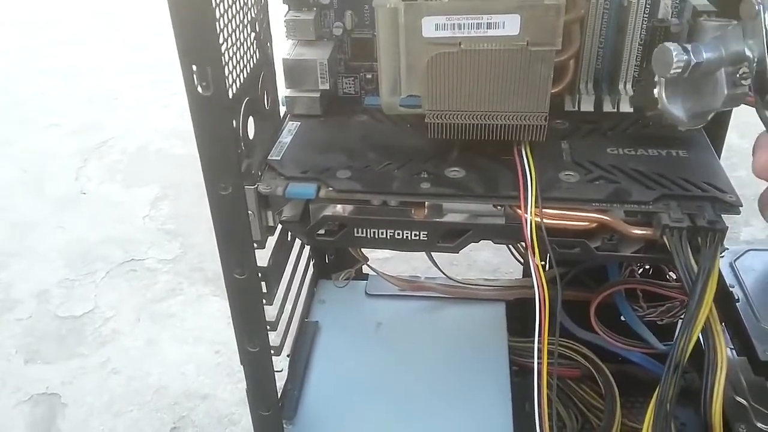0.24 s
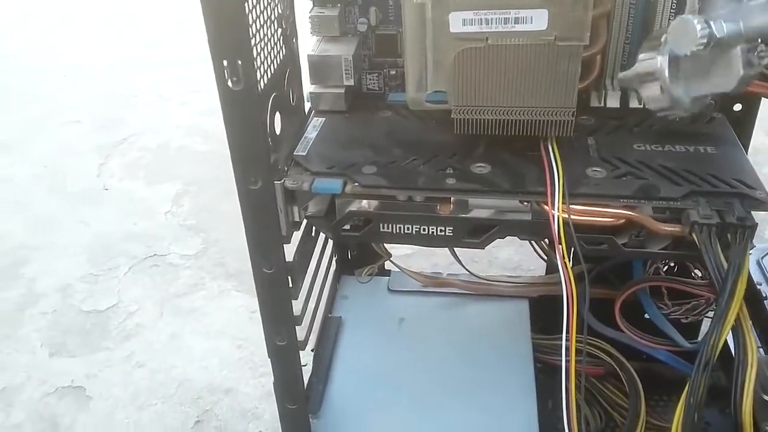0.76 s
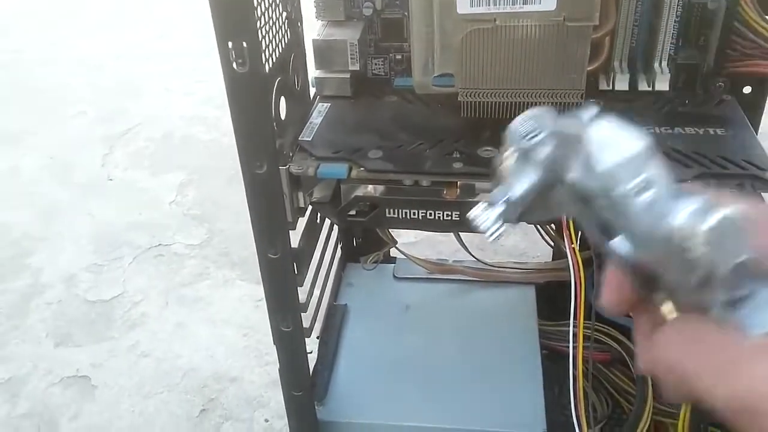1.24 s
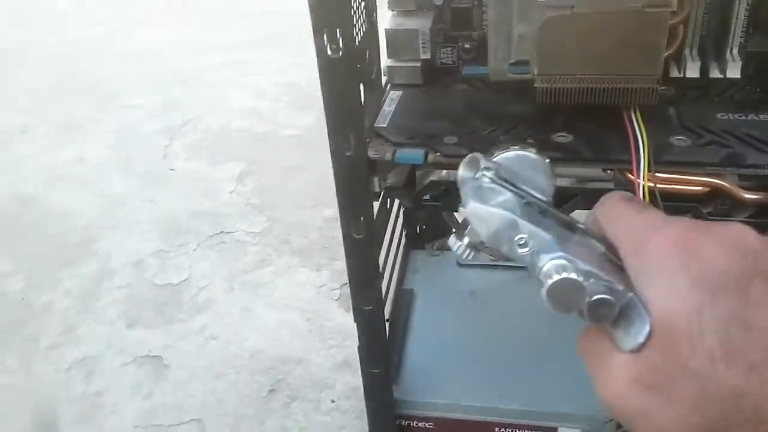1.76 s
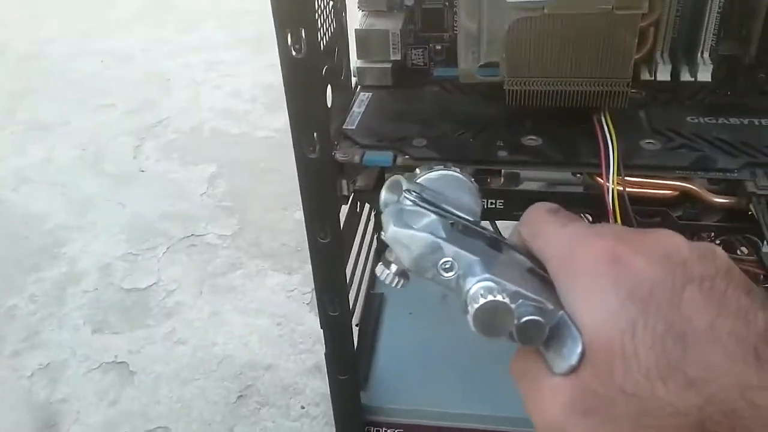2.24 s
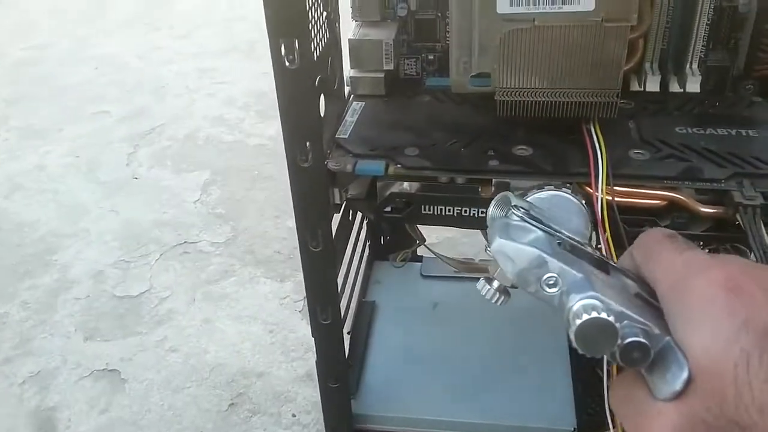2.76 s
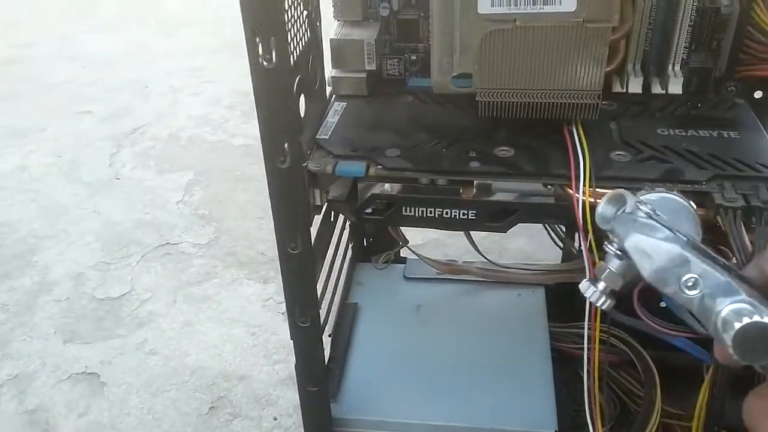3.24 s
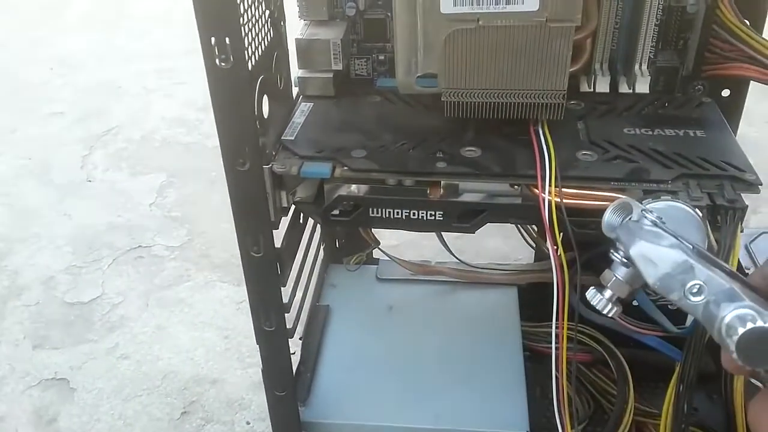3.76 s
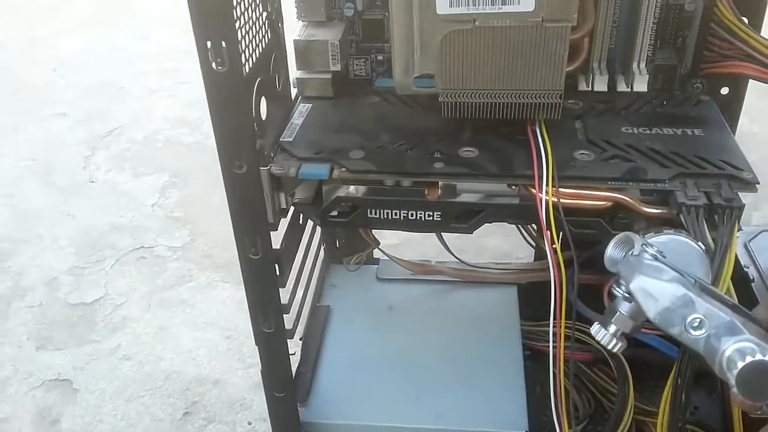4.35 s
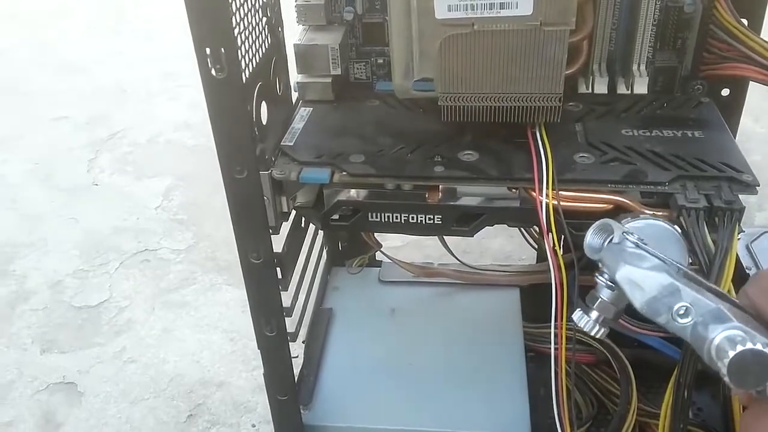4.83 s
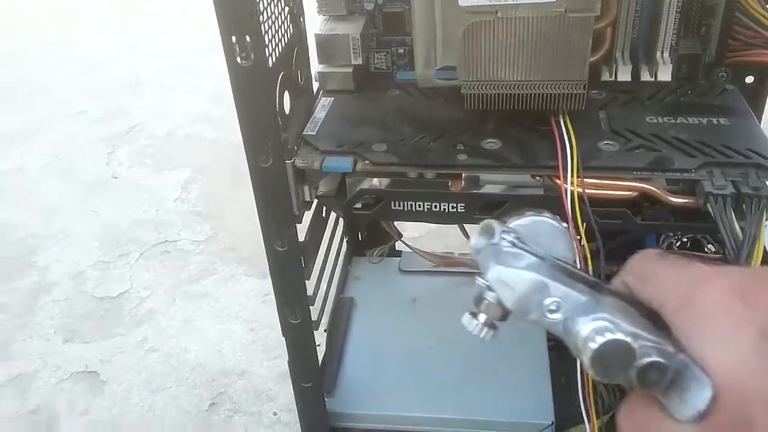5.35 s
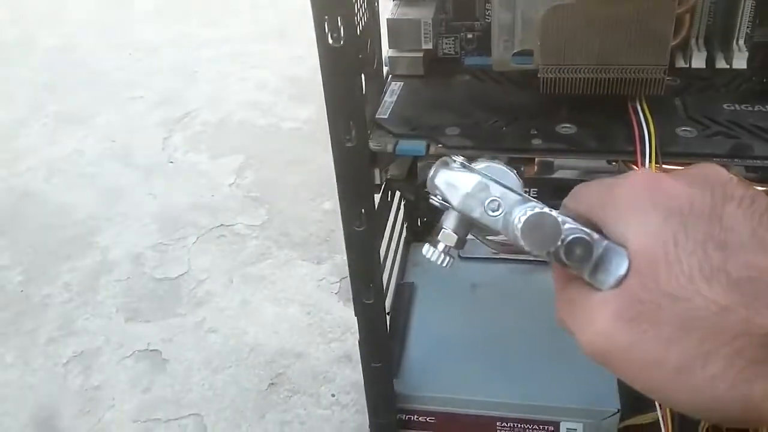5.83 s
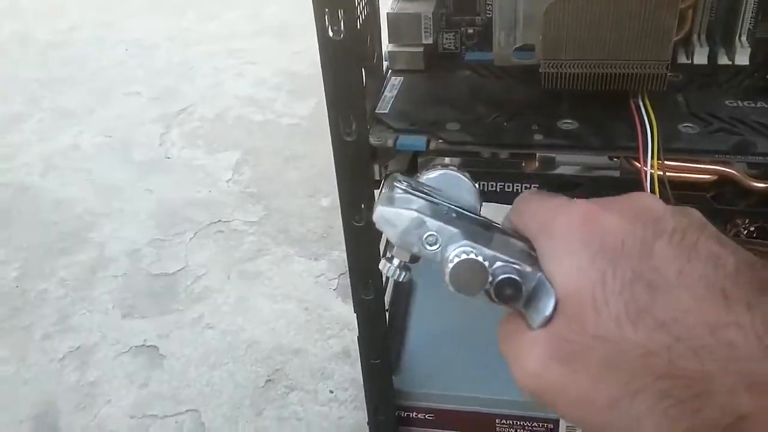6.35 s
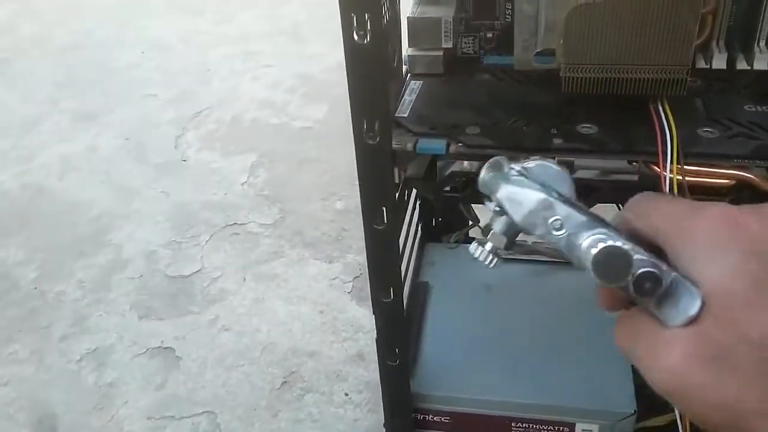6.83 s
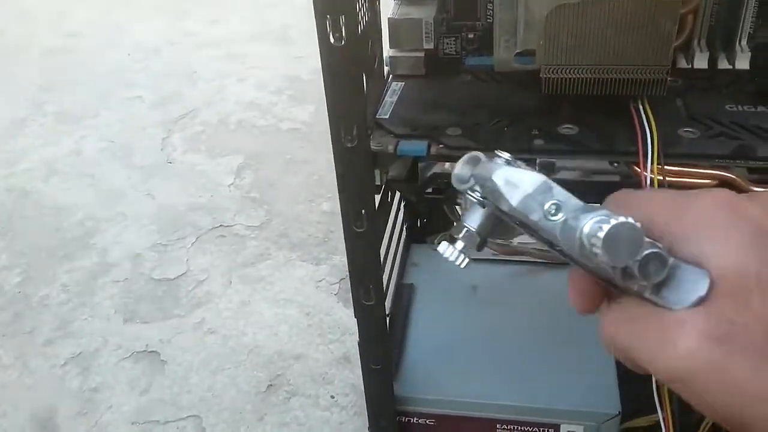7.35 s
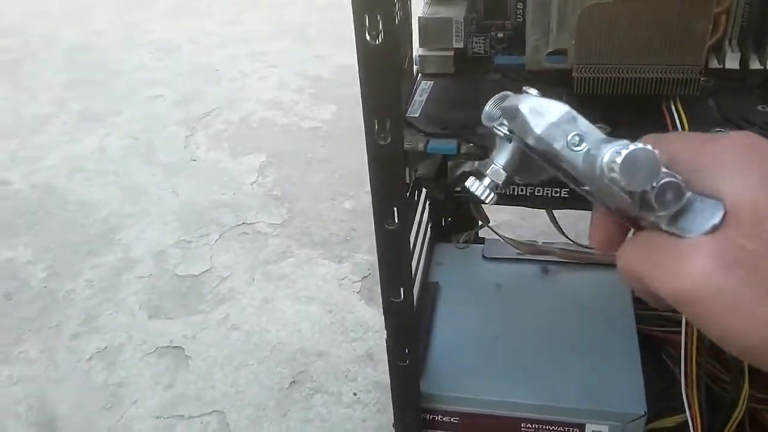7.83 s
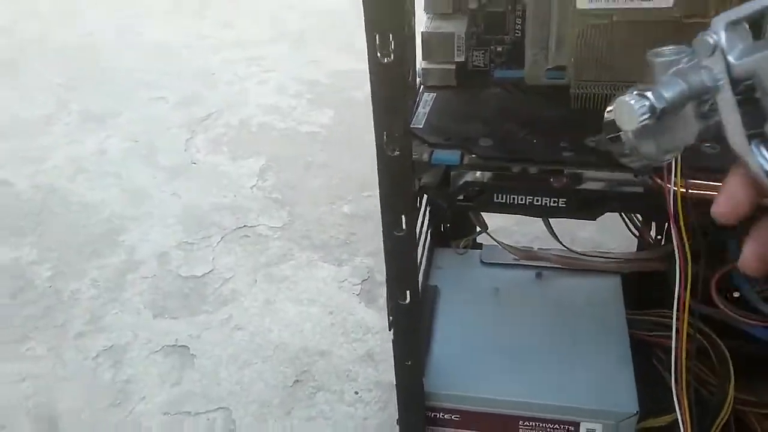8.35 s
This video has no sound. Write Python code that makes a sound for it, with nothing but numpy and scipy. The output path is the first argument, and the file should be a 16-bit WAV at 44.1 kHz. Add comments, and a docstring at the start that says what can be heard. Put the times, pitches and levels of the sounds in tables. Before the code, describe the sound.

A close, centred listen to an air blow gun cleaning an open computer case in a workshop with low rumble and a faint wavering hum near 108 Hz. Thirteen dense, turbulent puffs, each about 0.2 seconds with quick onset and cutoff, start at 0.3, 0.8, 1.85, 2.4, 3.0, 3.55, 4.1, 4.9, 5.9, 6.6, 7.15, 7.7 and 8.0 seconds. Most swell and brighten as they flow; their tint varies, the first two airy, others hollow, resonant or sharply hissing. Short case and room tails follow. Barely audible fan tones coast after several puffs, mostly falling in pitch, and fins ring faintly around 2.05 and 3.3. A tiny sliding squeak comes at 1.3 to 1.4. Soft rubs and dull bumps of hand and hose appear at 5.8, 7.1, 7.5, 7.9 and 8.3. Small bright steel trigger ticks close it at 8.3 and, doubled, 8.46.

```python
"""In a workshop, a spray gun blows thirteen short puffs of compressed air into an open computer case, close by.
The jet is turbulent noise shaped by what it hits: edges hiss, gaps and case resonate, panels add comb colour.
Decaying fin tones, sliding fan and squeak tones, steel ticks and swells of band-limited noise surround the puffs.
Diffuse tails give the case and workshop their answer; low noise and a wavering hum lie beneath."""
import sys
import numpy as np
from scipy import signal
from scipy.fft import rfft, irfft, next_fast_len
from scipy.io import wavfile
from scipy.ndimage import map_coordinates

SR = 44100
rng = np.random.default_rng(int(sys.argv[2]) if len(sys.argv) > 2 else 0)


def dump_mix(stems):
    """Bounce the given channels to the path in sys.argv[1] as a 16-bit WAV at rate SR."""
    frames = np.atleast_2d(stems).T  # one column per channel
    limited = np.clip(frames, -1, 1)  # hard clip at full scale
    pcm = np.round(limited * 32767).astype(np.int16)
    wavfile.write(sys.argv[1], SR, pcm)


N = 378819

# Trigger pulls. A gain scales the build-up of the flow, an arch the bulge as the jet sweeps across its mark;
# each puff excites one broad hollow and two narrow gaps:
# (valve opens [s], valve closes [s], strength [dB], its gain [dB], its arch [dB],
#  brightness [dB per octave], its gain [dB per octave], its arch [dB per octave],
#  edge hiss [dB], its gain [dB], hollow [Hz], hollow boost [dB],
#  lower gap [Hz], lower gap boost [dB], upper gap [Hz], upper gap boost [dB])
TRIGGER_PULLS = [(0.33, 0.515, -27, 5.5, 1.5, -4, 2.5, 1.1, 5.5, -12, 1050.0, 1.5, 2300, 5.5, 13980.0, 11),
                 (0.821, 0.997, -27.5, 8, -2.5, -1.76, 5, 0.5, 0, 0, 1790.0, 5.5, 4600, 3, 14430.0, 2),
                 (1.853, 2.054, -25.5, 3, -0.2, 3, 3, 1, 5, 20.0, 520.0, 8.5, 1400.0, 8, 1700.0, 5),
                 (2.389, 2.592, -23.5, 2, 1.5, -0.26, 2.5, 0.5, -2.5, 5.5, 5020.0, 4, 1464, 5.5, 2220, 7),
                 (3.017, 3.212, -25, 6, 0.3, 0.2, 4.5, -0.5, 4.5, 0, 4560, 3, 1470.0, 0.5, 13860.0, 4.5),
                 (3.557, 3.768, -24.5, 4, 0.4, 0, 1, 1, 2, 1, 3840.0, 7, 5810.0, 5, 11340.0, 3),
                 (4.08, 4.277, -25, 3, 1, -0.2, 5, 1, -0.9, -1, 6000.0, 3.7, 2810, 4.5, 3670, 5),
                 (4.925, 5.131, -24, 7.5, 0.4, -0.95, 1.5, 0.3, -2.5, 0, 840, 2, 1850.0, 2.5, 3810.0, 3.5),
                 (5.931, 6.137, -28.5, 6.5, 0, 0.15, 2.5, 1.8, -1, 7, 6000.0, 2.5, 2260, 5.5, 3630, 1.5),
                 (6.595, 6.801, -25.5, 9.5, -1.3, 2, 1, 0.6, 0, 3.6, 490.0, 2.8, 1430.0, 4, 2270, 5.5),
                 (7.14, 7.343, -24, 0.5, 4, 1.6, 0, 1.8, -4, 0.3, 720.0, 3.5, 2200, 4.5, 8000, 5),
                 (7.69, 7.882, -24.5, 1.5, -1.8, 1.57, 3.5, 2.1, 4.5, 16.5, 450.0, 0.5, 3590.0, 3.5, 8700.0, 5.7),
                 (8.017, 8.211, -27, 9, -3, 3, -1.7, 3.5, 13.5, -8, 450.0, 6, 3110, 8, 4700, 7)]
# Spectrum of the jet inside the case: (frequency [Hz], relative density [dB per Hz])
JET_SPECTRUM = [(60.0, -31), (250.0, -17), (450.0, -10), (700.0, -10), (950.0, -2.5), (1500.0, -1.5),
                (2200.0, 0.5), (2850.0, -6.5), (3300.0, -6.5), (4500.0, -4.5), (6200.0, -2.5), (9000.0, -8),
                (12000.0, -11), (15600.0, -17.5)]
# Resonances of the case, excited by every puff: (centre [Hz], width [Hz], boost [dB])
CASE_RESONANCES = [(2600, 320.0, 3.5), (3278, 460, 9), (4310, 730, 4.5), (6500.0, 430, 1.1),
                   (10100, 590.0, 1.0)]
# Heat-sink fins left singing by a puff:
# (start [s], end [s], frequency [Hz], initial level [dB], fade [dB per s], waver [dB])
SINGING_FINS = [(2.04, 2.42, 6298, -68, 45, 4.5), (2.041, 2.4, 1420, -55, 107, -0.5),
                (3.259, 3.58, 4210, -65, 4.5, 1.5)]
# Fans spun up by the air, coasting: (start [s], end [s], start tone [Hz], end tone [Hz], peak level [dB])
COASTING_FANS = [(0.997, 1.7, 815, 770, -66.5), (0.998, 1.7, 2010, 1880, -74.5),
                 (0.522, .85, 2750, 2600, -75), (2.592, 3.05, 642, 580, -64.5),
                 (2.6, 3.05, 504, 479, -61.5), (4.3, 4.92, 1880, 1950, -76), (4.302, 5.0, 452, 444.5, -66)]
# A thin squeak that slides up and down: (time [s], frequency [Hz], level [dB])
SQUEAK_SLIDE = [(1.31, 2150, -79), (1.347, 2300, -66), (1.376, 2180, -59), (1.383, 2560, -70),
                (1.396, 2760, -63), (1.403, 2350, -67), (1.412, 1970, -62), (1.424, 1900, -85)]
# Trigger taps on the gun: (time [s], level [dB], ring length [share of the steel's decay time])
TRIGGER_TICKS = [(8.309, -52.5, 0.28), (8.461, -59, .9), (8.467, -58.5, 0.72)]
# Modes of the gun's steel: (frequency [Hz], relative level [dB], t60 before each tick's share [s])
STEEL_MODES = [(4560, -2.5, .1), (6500, -16.5, .03), (7400, -7, 0.08), (11280, -12, .06)]
# Narrow noise around and just after the squeak (first two rows), then hose and hand rubs and bumps:
# (middle [s], length [s], centre [Hz], width [octaves], level [dB])
NOISE_SWELLS = [(1.421, .12, 2787, .06, -66), (1.4, .08, 5580, .08, -80), (5.815, .035, 2295, 0.087, -63.5),
                (7.07, .14, 70.1, 0.66, -52.5), (7.485, 0.05, 1220, 0.45, -58),
                (7.919, 0.17, 323, 0.27, -47.5), (8.29, 0.13, 156, 0.48, -55.5)]
# Decay of the workshop's tail: (frequency [Hz], t60 [s])
WORKSHOP_DECAY = [(200, .45), (1000, 1), (3000, 0.68), (7000, 0.38), (15000, 0.17)]
# Spectrum of the workshop noise: (frequency [Hz], relative density [dB per Hz])
WORKSHOP_SPECTRUM = [(20, -50), (40, -26), (55, -7), (70, -1.5), (90, -4), (120, -.5), (170, -4),
                     (240, -6.5), (310, -9.5), (390, -9.5), (700, -17.5), (1200, -23.5), (2200, -29.5),
                     (3200, -38.5), (4500, -47), (7000, -53), (16000, -52.5)]
# Level of the workshop noise: (time [s], level [dB])
WORKSHOP_LEVEL = [(0, -52.7), (3.3, -53.2), (4.5, -55.5), (6.4, -54.5), (8.5, -54.5)]

BUILD_POWER = 0.45  # flow grows as this power of progress: fast, then slowly
SWEEP_POWER = 1.4  # above 1, the sweep crests after the middle of a puff
HOLLOW_Q, GAP_Q = 1.02, 6.1  # centre over width
EDGE_HZ, EDGE_WIDTH_HZ = 8150, 2640  # fast eddies shed where air splits on a fin or wire
TOP_HZ = 15950  # upper band limit


def amp(db):
    """Amplitude ratio of a level in decibels."""
    return 10 ** (np.asarray(db) / 20)


def unit(x):
    """Normalization to an rms of 1."""
    return x / np.sqrt(np.mean(x ** 2) + 1e-20)


def along(points, hz):
    """Interpolation of (Hz, value) points on a logarithmic frequency axis."""
    f, v = np.transpose(points)
    return np.interp(np.log(hz + 1), np.log(f + 1), v)


def curves(rows, t):
    """Linear interpolation of each column after the time, at the times t."""
    s, *cols = np.transpose(rows)
    return [np.interp(t, s, c) for c in cols]


def bell(hz, centre_hz, width_hz):
    """Lorentzian resonance curve of height 1."""
    return 1 / (1 + (2 * (hz - centre_hz) / width_hz) ** 2)


def wobble(t, rate):
    """Smooth random fluctuation: a spline through random knots, rate of them a second."""
    knots = (t - t[0]) * rate
    return map_coordinates(rng.standard_normal(int(knots[-1]) + 4), [knots])


def filtered(x, gain):
    """Linear filtering: the spectrum of x times a gain that depends on frequency."""
    m = next_fast_len(x.shape[-1] + SR // 4)
    hz = np.fft.rfftfreq(m, 1 / SR)
    return irfft(rfft(x, m) * gain(hz), m)[..., :x.shape[-1]]


def clock(length):
    """Sample times over a length in seconds, at least 10 ms."""
    return np.arange(int(max(length, .01) * SR)) / SR


def add(track, s, sound):
    """Superposition of a sound on the track from time s."""
    part = track[max(round(s * SR), 0):][:len(sound)]
    part += sound[:len(part)]


def blow_gun():
    """Turbulent jet noise of all trigger pulls: the part towards the listener and the part filling the room."""
    direct, around = np.zeros((2, N))
    for row in TRIGGER_PULLS:
        s, (beam, spill) = puff(row, rng.standard_normal(SR // 4))
        add(direct, s, beam)
        add(around, s, spill)
    return direct, around


def puff(row, noise, rise=.011, fall=.013, shared=0.55, size=512):
    """Source and filter: jet turbulence swells and brightens, coloured by the resonances it excites."""
    opens, closes, strength_db, swell_db, arch_db, *colour = row
    bright_db, brighten_db, bright_arch_db, edge_db, edge_gain_db, *aimed_at = colour
    hz, t, z = signal.stft(noise, SR, nperseg=size)
    hz = hz[:, None]

    # two shapes, near zero on average: the flow builds up, and the hand sweeps the jet past its mark
    progress = np.clip(t / (closes - opens), 0, 1)
    build = progress ** BUILD_POWER - 1 / (1 + BUILD_POWER)
    sweep = np.sin(np.pi * progress ** SWEEP_POWER) ** 2 - .5
    level_db = strength_db + swell_db * build + arch_db * sweep
    tilt_db = bright_db + brighten_db * build + bright_arch_db * sweep
    octaves = np.log2(np.maximum(hz, 400) / 3000)
    jet_db = along(JET_SPECTRUM, hz) + level_db + tilt_db * octaves

    boost_db = (edge_db + edge_gain_db * build) * bell(hz, EDGE_HZ, EDGE_WIDTH_HZ)
    for centre_hz, width_hz, db in CASE_RESONANCES:
        boost_db = boost_db + db * bell(hz, centre_hz, width_hz)
    for centre_hz, db, q in zip(aimed_at[::2], aimed_at[1::2], (HOLLOW_Q, GAP_Q, GAP_Q)):
        boost_db = boost_db + db * bell(hz, centre_hz, centre_hz / q)
    comb = panel_echoes(hz, t, strength=0.18, longest=.0036, drift=0.0005, count=6)

    # the resonances beam out of the open side; the room gets only a share of their colour
    gains = np.array([comb * amp(jet_db + boost_db), amp(jet_db + shared * boost_db)])
    hiss = signal.istft(z * gains, SR, nperseg=size)[1]

    t = np.arange(hiss.shape[-1]) / SR
    opening = np.clip(t / rise, 0, 1)
    closing = np.clip((closes - opens + rise / 2 - t) / fall + .5, 0, 1)
    valve = np.sin(np.pi / 2 * opening * closing) ** 2
    return opens - rise / 2, hiss * valve


def panel_echoes(hz, t, strength, longest, drift, count):
    """Interference with echoes from the case's panels: comb colour, as delays change with the moving hand."""
    draws = rng.uniform(-1, 1, (count, 2))
    delays = [longest * (.6 + .4 * far) + drift * speed * t for far, speed in draws]  # seconds
    comb = 1 + strength * sum(np.exp(-2j * np.pi * hz * delay) for delay in delays)
    return np.abs(comb) / np.sqrt(1 + count * strength ** 2)


def fins():
    """Free vibration: thin fins ring on and decay unsteadily as the air stops."""
    track = np.zeros(N)
    for start, end, hz, db, fade_db, waver_db in SINGING_FINS:
        t = clock(end - start)
        tone = np.sin(2 * np.pi * hz * t + .7 * wobble(t, rate=60))
        level_db = db - fade_db * t + waver_db * wobble(t, rate=18)
        add(track, start, tone * amp(level_db) * signal.windows.tukey(len(t), .1))
    return track


def fans(rough=.6):
    """Blade tones of coasting fans: frequency integrated to phase, with a swell and a fade."""
    track = np.zeros(N)
    for start, end, start_hz, end_hz, db in COASTING_FANS:
        t = clock(end - start)
        phase = 2 * np.pi * np.cumsum(np.linspace(start_hz, end_hz, len(t))) / SR
        tone = np.sin(phase + rough * wobble(t, rate=23))
        add(track, start, amp(db) * tone * signal.windows.tukey(len(t), .5))
    return track


def squeak(rough=0.57, upper_hz=3370, upper_db=-9):
    """Frequency modulation: one sliding tone, with a weaker partial of fixed centre pitch above it."""
    track, start = np.zeros(N), SQUEAK_SLIDE[0][0]
    t = clock(SQUEAK_SLIDE[-1][0] - start)
    hz, db = curves(SQUEAK_SLIDE, start + t)
    slide = np.sin(2 * np.pi * np.cumsum(hz) / SR + rough * wobble(t, rate=400))
    upper = np.sin(2 * np.pi * upper_hz * t + wobble(t, rate=200))
    add(track, start, amp(db) * (slide + amp(upper_db) * upper))
    return track


def ticks(crack_db=-3, crack_t60=.012):
    """Impact excitation: the loose trigger taps the gun, giving a bright crack and decaying steel modes."""
    track, t = np.zeros(N), clock(.2)
    for s, db, share in TRIGGER_TICKS:
        ring = np.zeros(len(t))
        for hz, level_db, t60 in STEEL_MODES:
            ring += amp(level_db - 60 * t / (t60 * share)) * np.sin(2 * np.pi * hz * t)
        crack = filtered(rng.standard_normal(len(t)), lambda hz: bell(hz, 7500, 6000))
        add(track, s, amp(db) * (ring + unit(crack) * amp(crack_db - 60 * t / crack_t60)))
    return track


def noise_swells():
    """Band-limited noise under a smooth swell: the squeak's noise, then rubs and bumps of hose and hand."""
    track = np.zeros(N)
    for s, length, centre_hz, octaves, db in NOISE_SWELLS:
        band = lambda hz: np.exp(-.5 * (np.log2((hz + 1) / centre_hz) / octaves) ** 2)
        count = len(clock(length))
        noise = unit(filtered(rng.standard_normal(SR // 2), band)[:count])
        add(track, s - length / 2, amp(db) * noise * np.hanning(len(noise)))
    return track


def reverb(x, decay):
    """Diffuse reverberation: convolution with a noise tail whose frequencies decay at their own speeds."""
    hz, t, z = signal.stft(rng.standard_normal(SR * 3 // 4), SR, nperseg=256)
    fading = amp(-60 * t / along(decay, hz)[:, None])
    tail = signal.istft(z * fading, SR, nperseg=256)[1]
    delayed = np.pad(tail, (SR // 300, 0))  # starts after 1/300 s
    return signal.fftconvolve(x, delayed / np.linalg.norm(tail))[:N]


def room_tone(hum_hz=107.6, hum_db=-58, hum_fade_db=1.0):
    """Random noise shaped in frequency, plus a wavering hum that slowly fades (dB per s)."""
    t = np.arange(N) / SR
    level_db, = curves(WORKSHOP_LEVEL, t)
    rumble = unit(filtered(rng.standard_normal(N), lambda hz: amp(along(WORKSHOP_SPECTRUM, hz))))
    hum = np.sin(2 * np.pi * hum_hz * t + 1.2 * wobble(t, rate=6))
    hum_level_db = hum_db - hum_fade_db * t + 2.6 * wobble(t, rate=2.2)
    return amp(level_db) * rumble + hum * amp(hum_level_db)


def scene(case_db=-18.0, room_db=-26.0, far_db=-40):
    """Superposition of close, centred sources with tails of the case, the workshop and its far corners."""
    jet, spill = blow_gun()
    small = fins() + fans() + squeak() + ticks() + noise_swells()
    around = spill + small
    # decay points are (frequency [Hz], t60 [s])
    case = amp(case_db) * reverb(around, [(1000, 0.3), (10000, 0.059)])
    room = amp(room_db) * reverb(around, WORKSHOP_DECAY)
    far = amp(far_db) * reverb(around, [(1000, .9), (12000, 1.0)])
    mono = jet + small + case + room + far + room_tone()
    return np.array([mono, mono])


def record(dry):
    """Band limitation: a low-pass whose gain falls to zero over 400 Hz around TOP_HZ."""
    return filtered(dry, lambda hz: np.clip((TOP_HZ - hz) / 400 + .5, 0, 1))


dry = scene()
out = record(dry)
dump_mix(out)
```